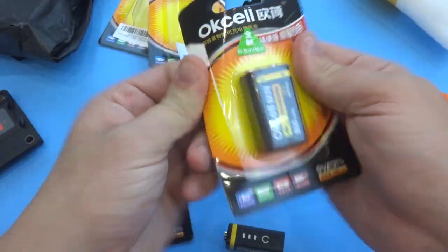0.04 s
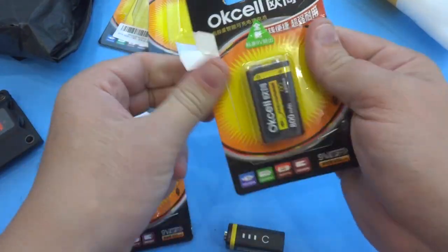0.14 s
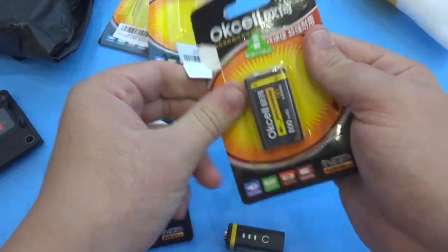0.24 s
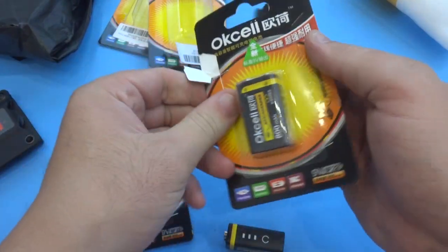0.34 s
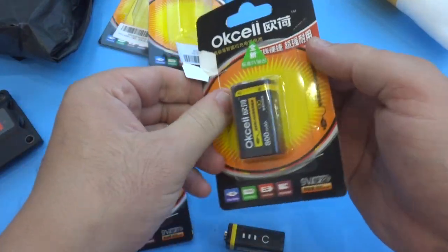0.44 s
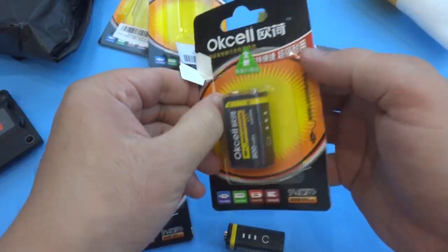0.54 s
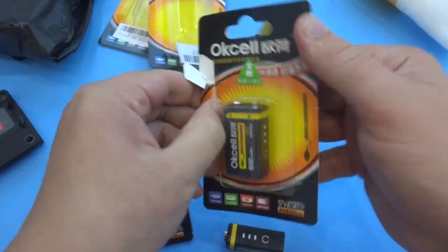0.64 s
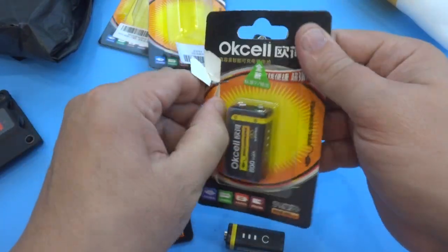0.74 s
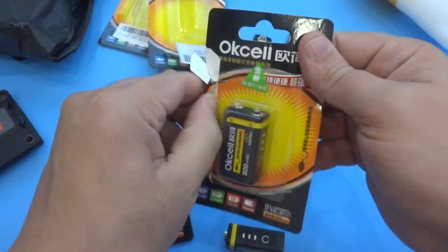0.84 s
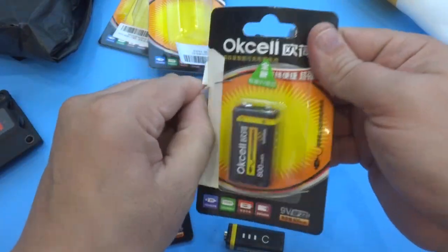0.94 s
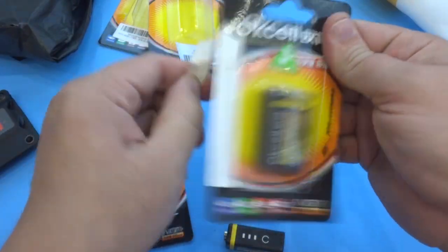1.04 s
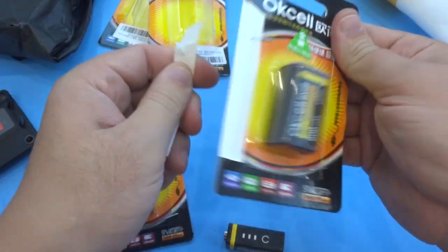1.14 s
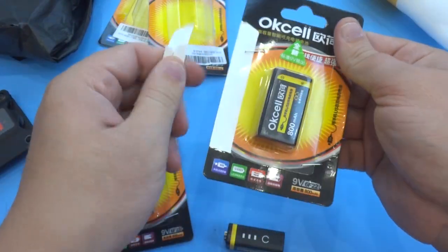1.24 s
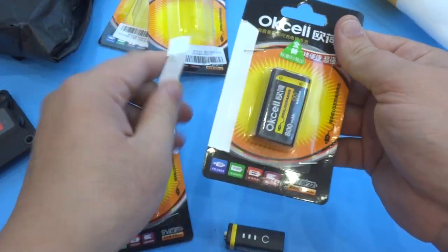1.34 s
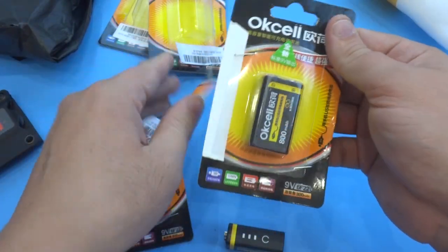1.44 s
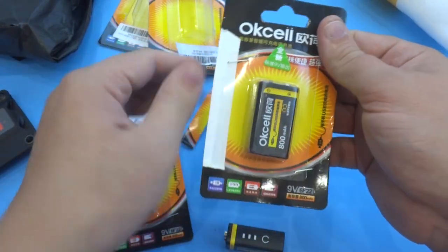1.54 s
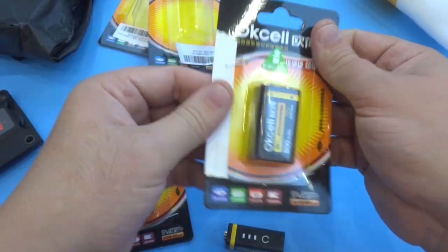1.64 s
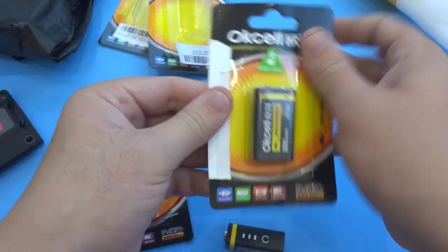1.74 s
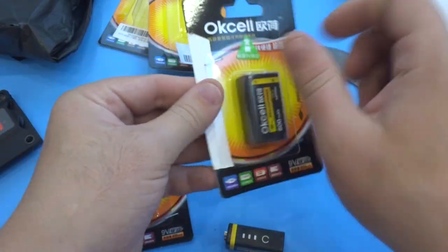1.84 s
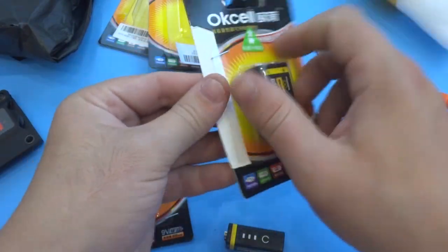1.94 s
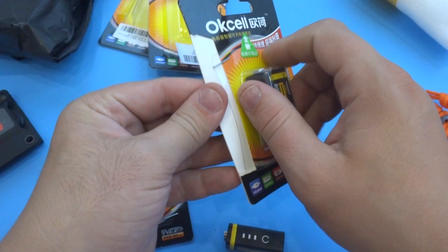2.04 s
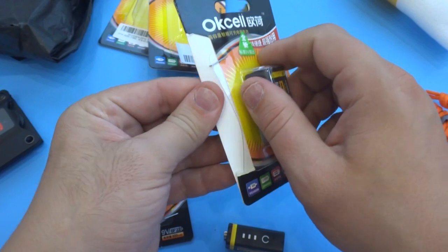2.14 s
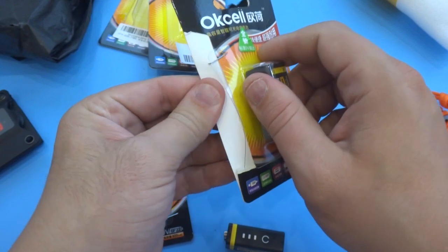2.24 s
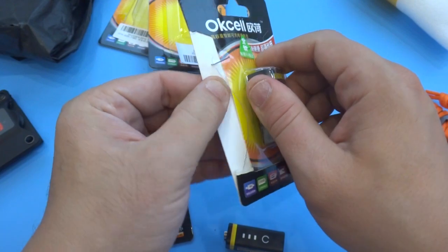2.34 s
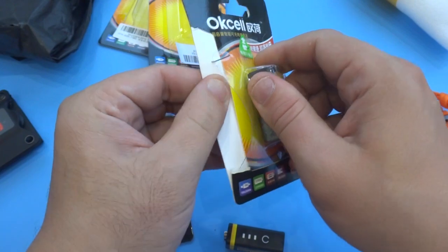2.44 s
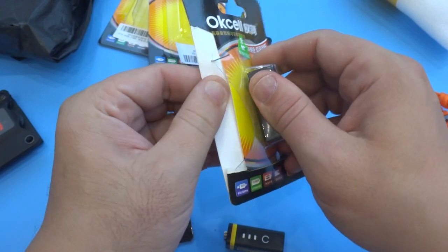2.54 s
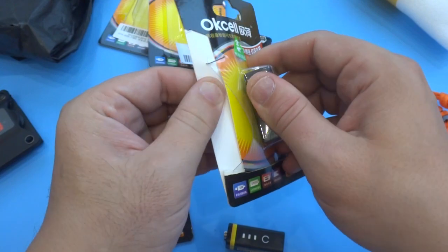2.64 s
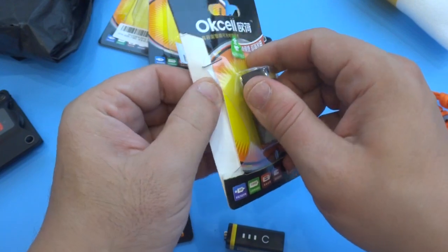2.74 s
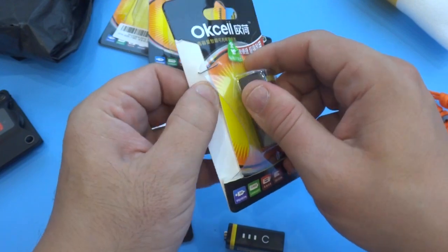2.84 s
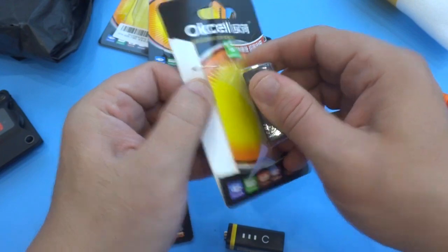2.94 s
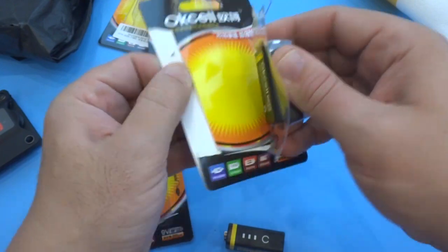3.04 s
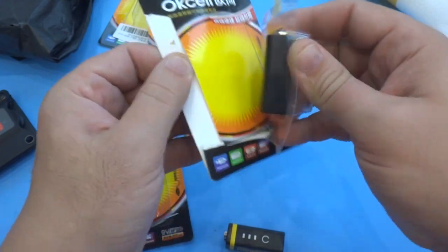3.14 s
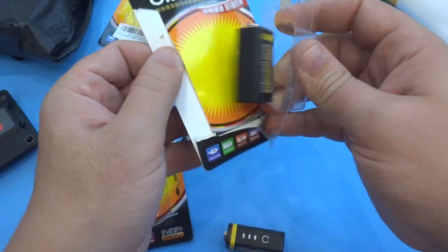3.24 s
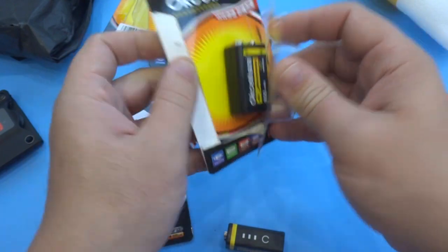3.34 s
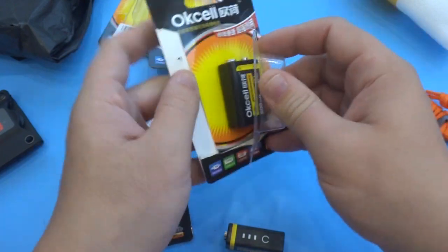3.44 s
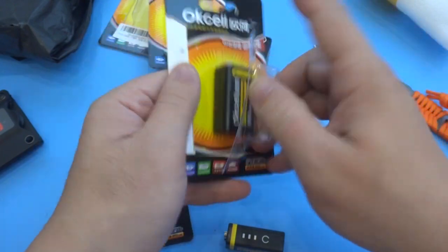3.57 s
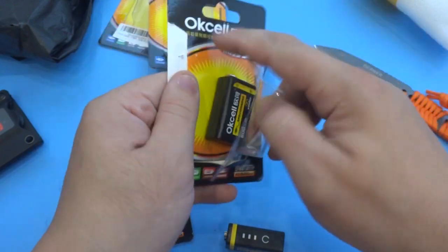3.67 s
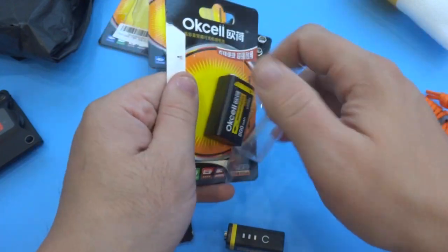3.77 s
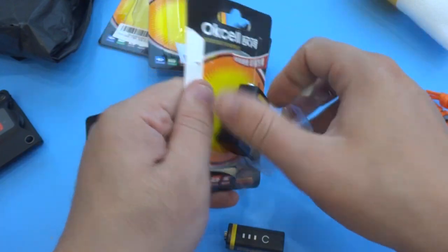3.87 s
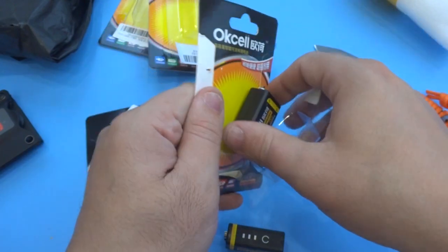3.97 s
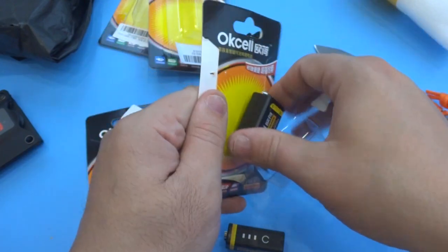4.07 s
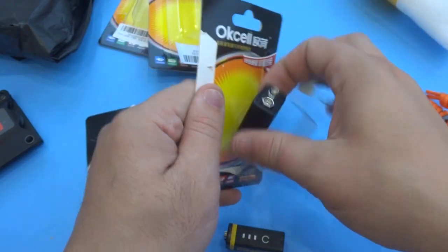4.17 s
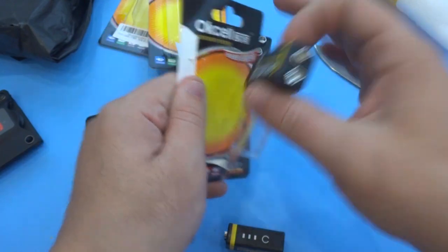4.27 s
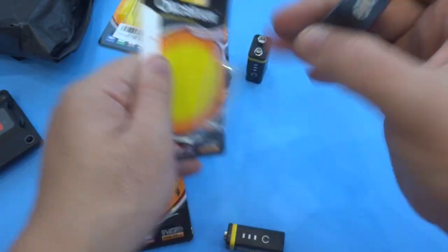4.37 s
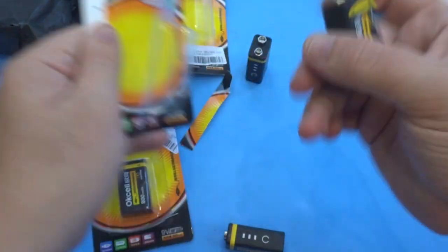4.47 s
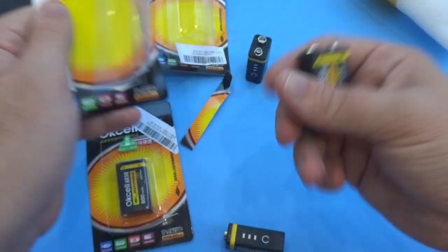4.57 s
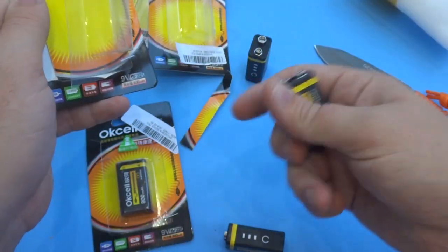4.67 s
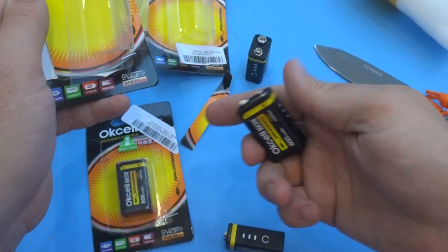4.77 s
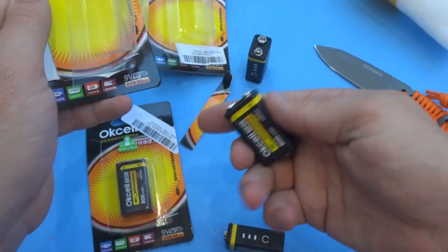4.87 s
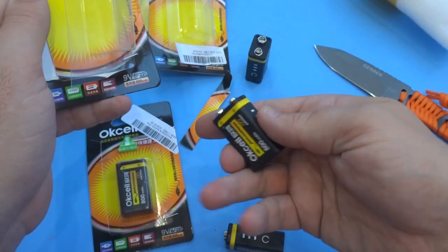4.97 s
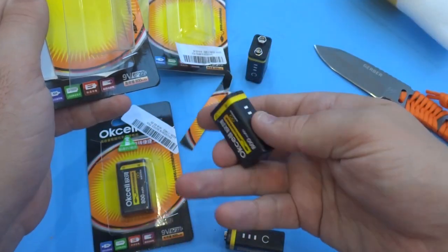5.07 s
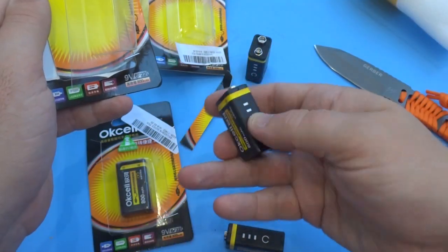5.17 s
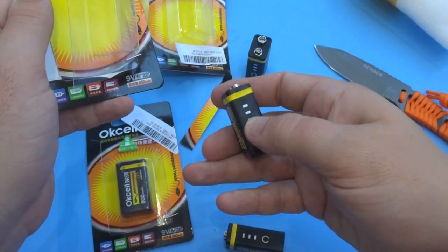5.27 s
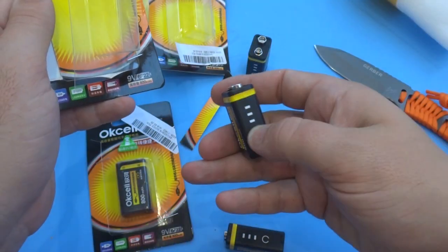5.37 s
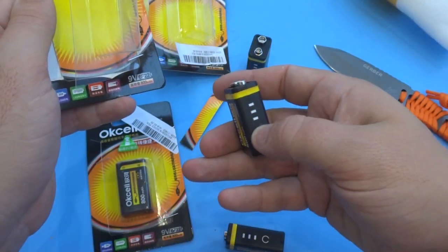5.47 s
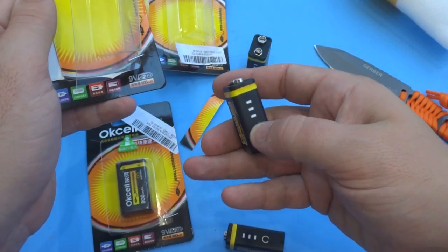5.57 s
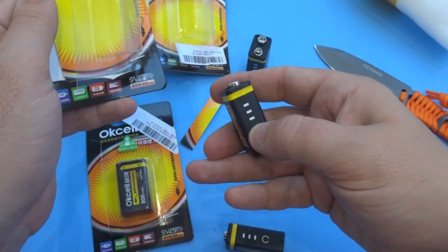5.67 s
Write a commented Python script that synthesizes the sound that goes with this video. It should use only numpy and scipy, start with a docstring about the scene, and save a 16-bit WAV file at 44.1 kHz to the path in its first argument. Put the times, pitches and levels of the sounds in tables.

```python
"""A low room rumble with a hiss and a faint high whine, and over it two hands peel a plastic blister off its card
and take out a battery. Rumble, hiss and whine are filtered noise. Fingers slide over plastic and card, and the glued
card rips in short bursts: both are trains of random impulses through the spectrum of the pack, under swelling envelopes.
The blister pops as decaying sine pairs and its film snaps as short noise bursts with a kick.
A small room adds scattered echoes, and two close microphone ports colour the stereo image."""
import sys
import numpy as np
from scipy import signal
from scipy.fft import rfft, irfft
from scipy.io import wavfile
from scipy.ndimage import uniform_filter1d

SR = 44100
rng = np.random.default_rng(int(sys.argv[2]) if len(sys.argv) > 2 else 0)


def persist_wave(psi):
    """Save psi, clipped to +-1, as 16-bit WAV."""
    counts = np.round(np.clip(psi, -1, 1) * 32767).astype(np.int16)
    wavfile.write(sys.argv[1], SR, np.atleast_2d(counts).T)


N = 251811

# Spectrum of the pack when it cracks or rips: f/Hz, relative density level/dB
PACK_SPECTRUM = [(150, -19), (330, -7), (570, -7), (800, -1), (1400, -5.5), (2000, -10), (2450, -8.5),
                 (3200, -4), (4200, -3.5), (7200, 4.5), (8500, -1.5), (9800, -12.5), (13000, -7),
                 (16500, -21)]

# Every rub, rip and snap has a strength (nominal level in the crack register) and a hollowness
# (how much of the shell joins in). A hollow one gains shell, or card and shell, relative to its fizz.


def from_db(db):
    """Amplitude gain is ten to the power of level/20."""
    return 10 ** (np.asarray(db) / 20)


def unit(x):
    """Normalisation by the root mean square brings a signal to rms 1."""
    return x / np.sqrt(np.mean(x ** 2) + 1e-20)


def lookup(points, hz):
    """Linear interpolation of a table over the logarithm of frequency."""
    f, value = np.transpose(points)
    return np.interp(np.log(hz + 1), np.log(f), value)


def add(mix, s, sound):
    """Superposition: a sound is summed into the mix from time s."""
    part = mix[..., max(round(s * SR), 0):][..., :sound.shape[-1]]
    part += sound[..., :part.shape[-1]]


def colour(x, points):
    """Linear filtering: the spectrum is multiplied by a smooth gain, then scaled to rms 1."""
    gain = from_db(lookup(points, np.fft.rfftfreq(N, 1 / SR)))
    return unit(irfft(rfft(x) * gain, N))


def stereo_noise(points, width, level_db):
    """Interchannel coherence: a shared noise plus an opposed one of relative amplitude width."""
    shared, opposed = rng.standard_normal((2, N))
    pair = [colour(shared + sign * width * opposed, points) for sign in (1, -1)]
    return from_db(level_db) * np.array(pair)


def rumble():
    """Low-frequency stationary noise of the room, largely coherent between the ears."""
    # Spectrum of the room rumble: f/Hz, relative density level/dB
    rumble_spectrum = [(15, -15), (27, 4), (38, -9.5), (52, -16), (66, 4.5), (95, -11), (135, 0.5),
                       (165, -6.5), (250, -5), (340, -14.5), (900, -25), (2000, -47)]
    return stereo_noise(rumble_spectrum, width=0.5, level_db=-56)


def hiss():
    """Broadband stationary noise, less coherent between the ears than the rumble."""
    # Spectrum of the hiss: f/Hz, relative density level/dB
    hiss_spectrum = [(500, -10), (1200, -9.5), (2000, -8.5), (2900, -7), (3380, 4.5), (3900, -3.5),
                     (5000, -9.5), (6500, -2), (8300, -0.5), (9500, -2.5), (13500, -9), (16000, -12)]
    return stereo_noise(hiss_spectrum, width=0.83, level_db=-52)


def whine(hz=8350, width_hz=420, per_s=48, unsteady=0.5, pulse=0.26, level_db=-60):
    """Amplitude modulation: narrow-band noise chatters in decaying pulses at an uneven rate."""
    f = np.fft.rfftfreq(N, 1 / SR)
    bell = np.exp(-((f - hz) / width_hz) ** 2 / 2)
    tone = irfft(rfft(rng.standard_normal(N)) * bell, N)
    drift = unit(uniform_filter1d(rng.standard_normal(N), size=900))
    turns = np.cumsum(per_s * (1 + unsteady * drift)) / SR
    # pulse is the decay constant as a share of one turn
    return from_db(level_db) * unit(tone * np.exp(-(turns % 1) / pulse))


def tails(gap_s=0.00047, build_s=0.0018, width=0.13, size=16384):
    """Reverberation: scattered echoes build up after a short gap, and absorption kills the treble first."""
    # Reverberation time of the room: f/Hz, t60/s
    room_t60 = [(300, 0.35), (2500, 0.3), (7000, 0.25), (16000, 0.21)]
    t = np.arange(size) / SR
    echoes_per_s = 5000
    taps = rng.standard_normal((2, size)) * (rng.random((2, size)) < echoes_per_s / SR)
    taps *= 1 - np.exp(-np.maximum(t - gap_s, 0) / build_s)
    hz, frame_s, z = signal.stft(taps, SR, nperseg=256)
    decay = np.exp(-np.log(1000) * frame_s / lookup(room_t60, hz)[:, None])
    mid, side = signal.istft(z * decay, SR, nperseg=256)[1]
    return np.array([mid + width * side, mid - width * side]) / np.linalg.norm(mid)


def room(x, size=8192):
    """Time-varying convolution: the pack keeps moving, so about every 0.1 s meets another echo pattern."""
    out, padded = np.zeros((2, N + size)), np.pad(x, size)
    # half-overlapping sine windows: their squares sum to 1, which suits independent echo patterns
    window = np.sin(np.pi * np.arange(size) / size)
    for start in range(0, N + size, size // 2):
        piece = padded[start:start + size] * window
        add(out, start / SR, signal.fftconvolve(piece[None], tails(), axes=1))
    return out[:, size:]


def registers(points, size=1024):
    """Minimum phase: one causal impulse response of energy 1 for each register of a spectrum."""
    # Limits between flexing card, hollow shell, crack of the film and fizz of the finest creases: f/Hz
    register_edges = [200, 900, 2800, 9500, 17000]
    hz = np.fft.rfftfreq(size, 1 / SR) + 1
    responses = []
    for lo, hi in zip(register_edges, register_edges[1:]):
        band = 1 / np.sqrt((1 + (lo / hz) ** 12) * (1 + (hz / hi) ** 12))
        gain = band * from_db(lookup(points, hz))
        # folding the cepstrum onto positive time makes the response causal
        cepstrum = irfft(np.log(gain / gain.max() + 1e-3))
        cepstrum[1:size // 2] *= 2
        cepstrum[size // 2 + 1:] = 0
        response = irfft(np.exp(rfft(cepstrum)))
        responses.append(response / np.linalg.norm(response))
    return responses


def voiced(voice, strength_db, hollow_db):
    """Linear level law: each register's level in dB follows from strength and hollowness."""
    offset_db, slope = np.transpose(voice)
    return strength_db + offset_db + slope * hollow_db


def grains(points, per_s, spread_db, card_db):
    """Impulse excitation: tiny ruptures of uneven size ring the shell (with card), crack and fizz registers."""
    sizes = from_db(spread_db * np.minimum(rng.exponential(1, N), 4))
    train = sizes * rng.choice([-1, 1], N) * (rng.random(N) < per_s / SR)
    card, shell, crack, fizz = (signal.oaconvolve(train, r)[:N] for r in registers(points))
    return np.array([unit(shell + from_db(card_db) * card), unit(crack), unit(fizz)])


def catching(depth_db, size=160):
    """Stick and slip: an uneven gain that varies over a few milliseconds."""
    uneven = unit(uniform_filter1d(rng.standard_normal(N), size))
    return unit(from_db(depth_db * uneven))


def wander(x, depth_db, span_s, span_hz, size=512):
    """Time-varying resonance: the shell's spectrum drifts in patches as fingers bend and damp it."""
    z = signal.stft(x, SR, nperseg=size)[2]
    rows, frames = z.shape[-2:]
    along_hz = np.fft.fftfreq(rows, SR / size)[:, None] * span_hz
    along_s = np.fft.fftfreq(frames, size / 2 / SR) * span_s
    smoothing = np.exp(-along_hz ** 2 - along_s ** 2)
    patches = np.fft.ifft2(np.fft.fft2(rng.standard_normal((rows, frames))) * smoothing).real
    gain = unit(from_db(depth_db * unit(patches)))
    return signal.istft(z * gain, SR, nperseg=size)[1][..., :N]


def strokes(rows, voice, rise, sharpness, size=32768):
    """Energy addition: hand movements swell and fade, giving the gain of shell, crack and fizz over time."""
    # rise: share of a stroke spent swelling; sharpness: 1 = pointed top, 2 = round top
    power, t = np.zeros((3, N)), np.arange(size) / SR
    for s, length, strength_db, hollow_db in rows:
        start = max(s - size / SR / 2, 0)
        since = start + t - s
        side_length = length * np.where(since < 0, rise, 1 - rise)
        stroke = np.exp(-abs(since / side_length) ** sharpness)
        gain = from_db(voiced(voice, strength_db, hollow_db))[:, None]
        add(power, start, (gain * stroke) ** 2)
    return np.sqrt(power)


def rubs(level_db=-3.0, crinkle_db=-1):
    """Friction: skin and card slide over plastic, and dense fine stick and slip is nearly a hiss."""
    # Sliding strokes: peak t/s, length t/s, relative strength level/dB, hollowness level/dB
    rub_events = [(0.152, 0.025, -33.5, -1.5), (0.21, 0.077, -43.5, -37), (0.329, 0.017, -32.5, -5.5),
                  (0.67, 0.6, -48.5, -5.5), (0.79, 0.072, -44, -22), (0.89, 0.094, -44, -29),
                  (1.1, 0.013, -28, -58), (1.312, 0.037, -43, -59), (1.378, 0.035, -39.5, -45),
                  (1.57, 0.078, -58.5, 7), (1.703, 0.0076, -31, -9.5), (1.826, 0.021, -29.5, -12),
                  (1.915, 0.025, -46, -22), (2.05, 0.053, -30.5, -15), (2.115, 0.028, -35, -12.5),
                  (2.202, 0.014, -29, -25), (2.36, 0.19, -42, -12), (2.485, 0.097, -34.5, -12.5),
                  (2.83, 0.13, -39.5, -10.5), (2.98, 0.051, -28, -23), (3.19, 0.086, -40.5, -8),
                  (3.372, 0.026, -32.5, 4), (3.49, 0.22, -48.5, -41), (3.558, 0.018, -28.5, -7.5),
                  (3.642, 0.012, -28, -24), (3.7, 0.11, -39.5, -2), (3.795, 0.033, -27.5, -8),
                  (3.88, 0.036, -40, -5), (3.994, 0.014, -28, -5.5), (4.034, 0.029, -26.5, -7.5),
                  (4.11, 0.053, -39.5, -13), (4.27, 0.097, -28, -11), (4.52, 0.07, -37.5, -16),
                  (4.556, 0.023, -30.5, -40), (4.66, 0.068, -36, -15.5), (4.738, 0.068, -42.5, -25),
                  (4.982, 0.024, -37, -36), (5.057, 0.05, -43, -27), (5.135, 0.071, -45.5, -22),
                  (5.43, 0.077, -52, -31)]
    # Spectrum of the rubbed pack: f/Hz, relative density level/dB
    slide_spectrum = [(200, -23.5), (700, -22), (1300, -28), (2700, -15), (4300, -5.5), (5300, 1.5),
                      (7300, 9.5), (9800, -12), (13000, -8), (15000, -11.5), (16500, -30)]
    # Rows shell, crack, fizz: level above the strength/dB, gain per dB of hollowness/dB
    rub_voice = [(-1.5, 1), (-2.5, -0.15), (-3.5, -0.31)]
    push = strokes(rub_events, rub_voice, rise=0.54, sharpness=0.78)
    slips = grains(slide_spectrum, per_s=12000, spread_db=2.0, card_db=-2.5) * catching(depth_db=2.0)
    swish = (push * wander(slips, depth_db=1.7, span_s=0.084, span_hz=1380)).sum(0)
    # a stroke firm enough to sound the shell also sets off small separate creases
    creases = grains(PACK_SPECTRUM, per_s=150, spread_db=3.5, card_db=-2).sum(0)
    crinkle = push[0] * creases / 2
    return from_db(level_db) * swish + from_db(crinkle_db) * crinkle


def rips(level_db=-6.0):
    """Fracture: paper fibres break by the thousand while the blister is pulled from the card."""
    # Rips from the glue: hardest pull t/s, length t/s, relative strength level/dB, hollowness level/dB
    rip_events = [(0.92, 0.033, -26.5, -27), (0.982, 0.081, -17, -15.5), (1.102, 0.0073, -30, -4.5),
                  (1.995, 0.027, -32, -1), (2.535, 0.097, -28, -7.5), (2.955, 0.046, -33, 0.5),
                  (3.052, 0.067, -16, -10.5), (3.226, 0.049, -32, 1.5), (3.83, 0.0076, -16.5, -17),
                  (4.322, 0.021, -15, -12.5), (4.385, 0.033, -25, -11)]
    # Rows shell, crack, fizz: level above the strength/dB, gain per dB of hollowness/dB
    rip_voice = [(0, 1), (0.5, -0.13), (-3.5, -0.3)]
    pull = strokes(rip_events, rip_voice, rise=0.3, sharpness=1.4)
    # at 0 dB the catching leaves an even gain
    fibres = grains(PACK_SPECTRUM, per_s=5000, spread_db=3.0, card_db=-11.0) * catching(depth_db=0.0)
    drifting = wander(fibres, depth_db=-1.5, span_s=0.093, span_hz=1110)
    return from_db(level_db) * (pull * drifting).sum(0)


def pops(overtone=1.2, overtone_db=-9, attack_s=0.00022, size=8192):
    """Damped free vibration: the dome or a small taut patch rings with one overtone that decays twice as fast."""
    # Hollow pops, or knocks of a finger or the battery: t/s, f/Hz, nominal level/dB, t60/s
    pop_events = [(1.0482, 995, -25, 0.0092), (1.107, 386, -37.5, 0.043), (1.1966, 5900, -13, 0.011),
                  (1.5445, 780, -25, 0.029), (1.548, 413, -38, 0.06), (1.594, 290, -41, 0.096),
                  (1.653, 276, -46, 0.12), (2.409, 1030, -35, 0.015), (2.8, 820, -32.5, 0.018),
                  (2.942, 1056, -35, 0.17), (2.945, 734, -35.5, 0.29), (3.2492, 1424, -15, 0.03),
                  (3.353, 378, -27.5, 0.062), (3.354, 802, -31.5, 0.16), (3.842, 320, -30, 0.066),
                  (4.044, 1390, -31, 0.037), (4.048, 1120, -33, 0.046), (4.193, 1207, -20.5, 0.052),
                  (4.2, 1135, -41, 0.25), (4.335, 1350, -14, 0.015), (4.339, 1864, -26.5, 0.14)]
    t, out = np.arange(size) / SR, np.zeros(N)
    for s, hz, level_db, t60 in pop_events:
        fade = np.exp(-np.log(1000) * t / t60)
        ring = fade * np.sin(2 * np.pi * hz * t)
        ring += from_db(overtone_db) * fade ** 2 * np.sin(2 * np.pi * hz * overtone * t)
        add(out, s, from_db(level_db) * ring * (1 - np.exp(-t / attack_s)))
    return out


def snaps(flutter=0.28, flutter_s=0.0021, kick=0.91, creak=0.85, creak_s=0.00032, spread_db=1.0, size=2048):
    """Buckling: the film creaks, gives with a kick and shivers briefly; low registers ring longer."""
    # Buckling events of the film, and from about 3.6 s on also shell-heavy knocks of the battery against the
    # blister: t/s, strength level/dB, hollowness level/dB
    snap_events = [(0.0165, -38.5, -17), (0.1386, -36, -37), (0.1448, -31.5, -4), (0.1718, -43, 7.5),
                   (0.257, -30.5, -11), (0.399, -33, -1.5), (0.6556, -32, -16), (0.6601, -31, -20),
                   (0.6718, -29.5, -21.5), (0.6932, -36, -18), (0.869, -24, -16), (0.923, -22.5, -25.5),
                   (0.94, -25, -32), (0.9491, -19.5, -33), (0.965, -19, -13.5), (1.0479, -19.5, -8),
                   (1.1064, -26.5, -3.5), (1.1966, -34, -23), (1.5027, -30, -13), (1.5439, -40, -46),
                   (1.616, -36, 2), (1.7072, -31, -9), (1.983, -18.5, -8.5), (1.9925, -27.5, -7.5),
                   (2.1617, -23.5, -26.5), (2.174, -22.5, -24), (2.1866, -19.5, -22.5), (2.347, -33, -20),
                   (2.515, -29.5, -35), (2.5238, -17, -12.5), (2.642, -33, -28), (2.691, -31.5, -11.5),
                   (2.7991, -43, 5), (2.9434, -19, -11.5), (2.9985, -17, -26), (3.0258, -15, -14),
                   (3.2215, -17.5, -7.5), (3.248, -18, -6), (3.263, -23, -9.5), (3.278, -31, -7),
                   (3.3257, -31, 5.5), (3.347, -17.5, -5.5), (3.3525, -19.5, -9), (3.3798, -25.5, -5.5),
                   (3.5465, -21.5, -12), (3.6107, -32.5, 0), (3.618, -40.5, 10.5), (3.664, -22.5, 2),
                   (3.708, -28, -13), (3.7296, -25.5, 4), (3.733, -28, 0), (3.7646, -27.5, 1.5),
                   (3.783, -37.5, 8.5), (3.819, -22, -4), (3.8304, -23.5, -6), (3.841, -21.5, 0.5),
                   (3.9231, -32.5, -8.5), (4.0363, -19.5, 0.5), (4.0428, -27.5, 9.5), (4.048, -18, -3),
                   (4.1392, -22.5, -9.5), (4.1863, -26, -0.5), (4.1955, -19.5, -13), (4.2001, -19, -6),
                   (4.3367, -21.5, 2), (4.3677, -16, -23), (4.3791, -19, -14)]
    # Rows card, shell, crack, fizz: level above the strength/dB, gain per dB of hollowness/dB
    snap_voice = [(-5.5, 1), (-1, 1), (0.5, 0), (-5, -0.42)]
    fade_s = (.0036, .0022, .00065, .0006)  # card, shell, crack, fizz
    lead = size // 8  # samples of creak before the kick
    t = (np.arange(size) - lead) / SR
    out, responses = np.zeros((2, N)), registers(PACK_SPECTRUM)
    for s, strength_db, hollow_db in snap_events:
        snap = np.zeros(size)
        levels_db = voiced(snap_voice, strength_db, hollow_db)
        for response, level_db, fade in zip(responses, levels_db, fade_s):
            before = creak * np.exp(-abs(t) / creak_s)
            after = np.exp(-abs(t) / fade) + flutter * np.exp(-abs(t) / flutter_s)
            shiver = rng.standard_normal(size) * np.where(t < 0, before, after)
            shiver[lead] += kick
            ring = signal.fftconvolve(shiver, response)[:size]
            snap += from_db(level_db) * ring / np.linalg.norm(ring)
        snap *= np.sqrt(.002 * SR)  # levels are rms over 2 ms
        side_db = spread_db * rng.standard_normal() / 2
        add(out, s + t[0], snap * from_db([[side_db], [-side_db]]))
    return out


def blister(x, card_hz=950, card_loss=1.0, dome_db=-4.0):
    """Modal resonance: as the blister comes free, the card's low body goes and the hollow dome rings."""
    # How far the blister has come away from the card: t/s, share (0-1)
    freed_share = [(2.9, 0.0), (3.25, 0.12), (3.85, 0.34), (4.15, 0.68)]
    # Resonances of the freed dome: f/Hz, width/Hz, level before dome_db/dB
    dome_modes = [(1170, 57, 3.5), (1530, 330, 9), (1820, 13, -47), (2340, 53, 17)]
    freed = np.interp(np.arange(N) / SR, *np.transpose(freed_share))
    hz = np.fft.rfftfreq(N, 1 / SR)
    card = 1 / (1 + (hz / card_hz) ** 6)
    dome = sum(from_db(db) / (1 + 2j * (hz - centre) / width) for centre, width, db in dome_modes)
    change = irfft(rfft(x) * (from_db(dome_db) * dome - card_loss * card), N)
    return x + freed * change


def scene(snap_room_db=-6, pop_room_db=-14, rip_room_db=-7, rub_room_db=-12):
    """Superposition of the direct sound of the pack, its echo in the room, and the background."""
    rub, rip, pop, snap = blister(rubs()), blister(rips()), pops(), blister(snaps())
    feed = from_db(rub_room_db) * rub + from_db(rip_room_db) * rip
    feed += from_db(pop_room_db) * pop + from_db(snap_room_db) * snap.mean(0)
    return snap + pop + rip + rub + room(feed) + rumble() + hiss() + whine()


def record(dry):
    """Mid-side filtering by two close ports, soft saturation of the sharpest peaks, then a band limit."""
    # Gain of the difference between the ports: f/Hz, level/dB
    width_gain = [(40, -15), (140, -8), (350, 6), (1100, 10), (4500, -5), (9000, -4), (14000, -29)]
    # Gain of the left port: f/Hz, level/dB
    left_gain = [(6000, -0.29), (9600, -3), (11500, 0)]
    # Phase by which the left port leads: f/Hz, phase/rad
    left_lead = [(120, 0.053), (700, 0.33), (2600, 0.24)]
    hz = np.fft.rfftfreq(N, 1 / SR)
    mid = rfft(dry[0] + dry[1]) / 2
    side = rfft(dry[0] - dry[1]) / 2 * from_db(lookup(width_gain, hz))
    left = (mid + side) * from_db(lookup(left_gain, hz)) * np.exp(1j * lookup(left_lead, hz))
    ports = irfft(np.array([left, mid - side]), N)
    ceiling = .55
    rounded = ceiling * np.tanh(ports / ceiling)
    cut_hz = 16050
    low_pass = signal.firwin(401, cut_hz, window=("kaiser", 8), fs=SR)
    return signal.oaconvolve(rounded, low_pass[None], "same")


dry = scene()
out = record(dry)
persist_wave(out)
```